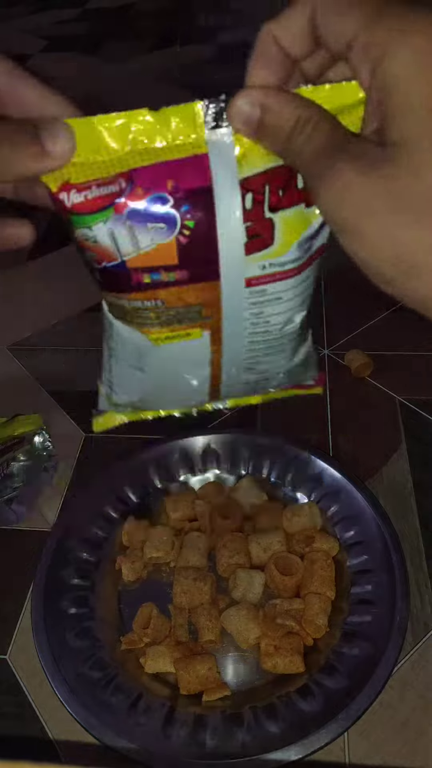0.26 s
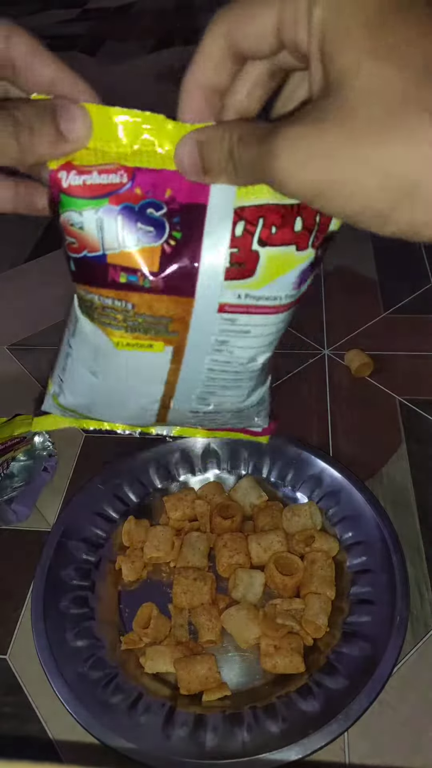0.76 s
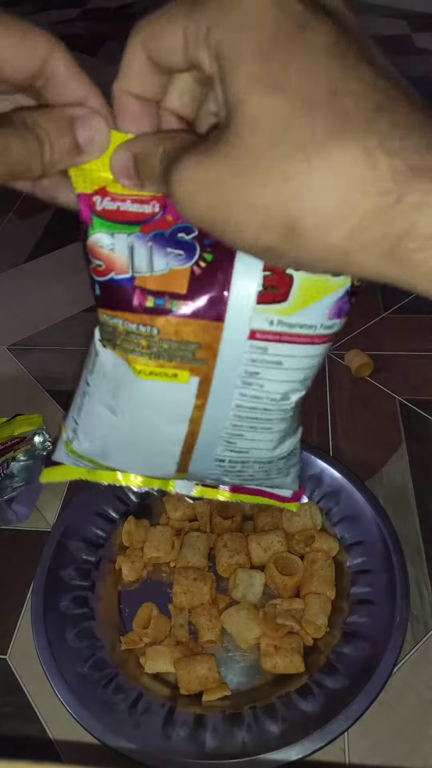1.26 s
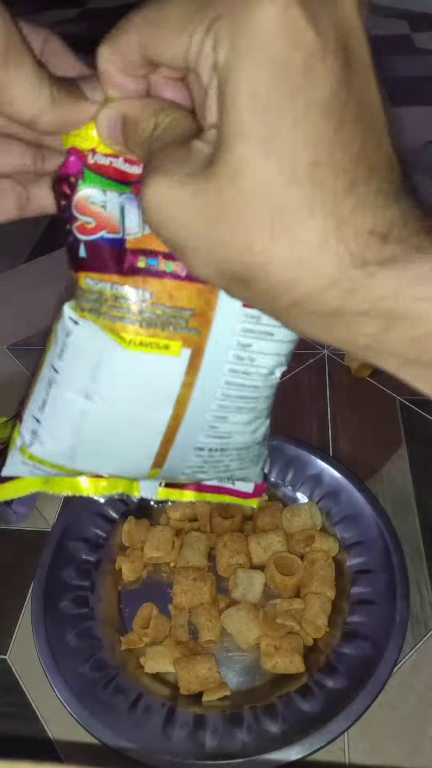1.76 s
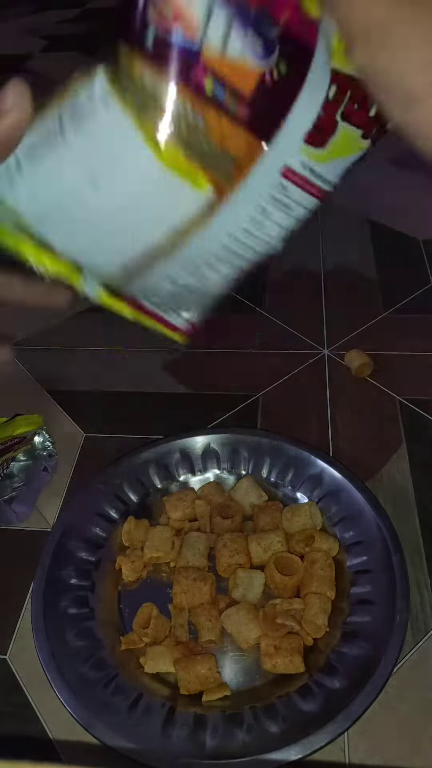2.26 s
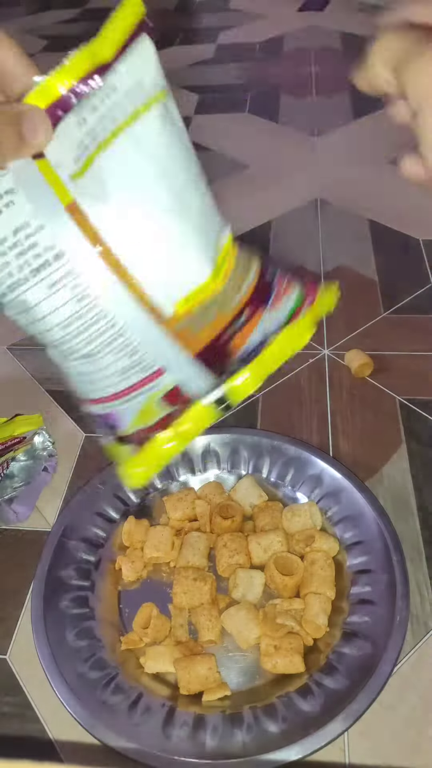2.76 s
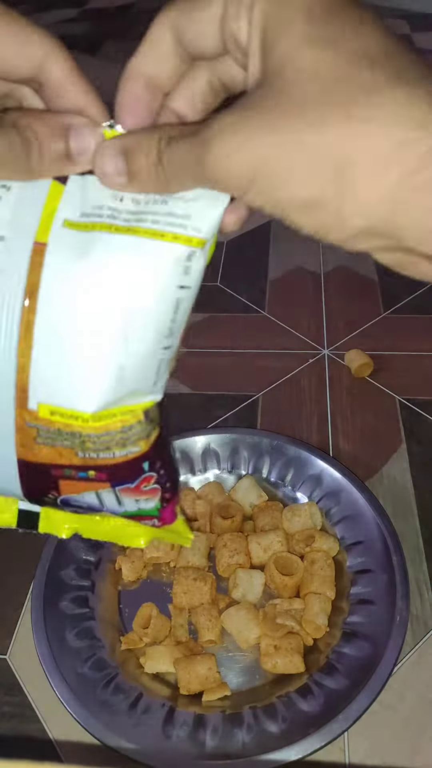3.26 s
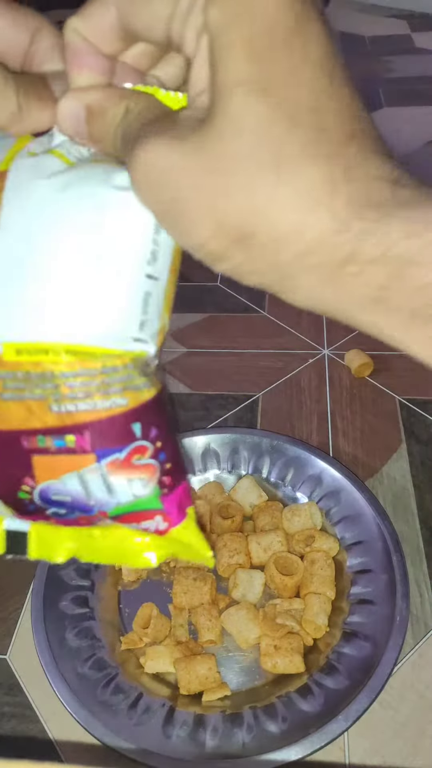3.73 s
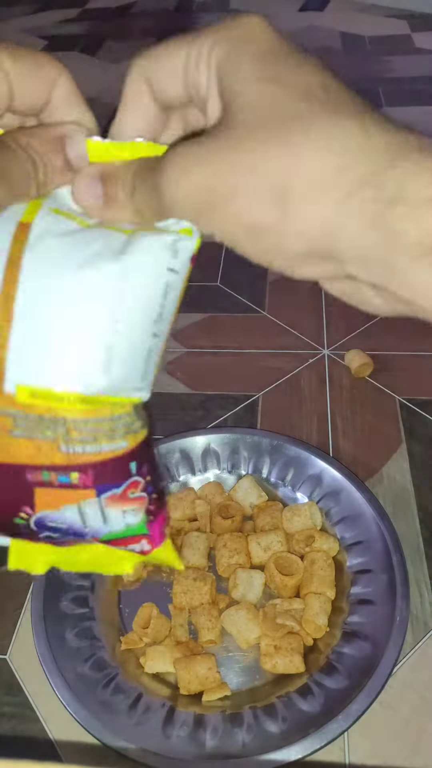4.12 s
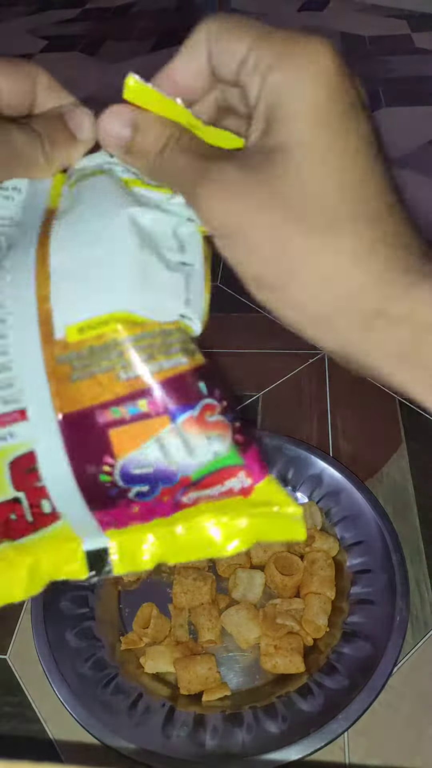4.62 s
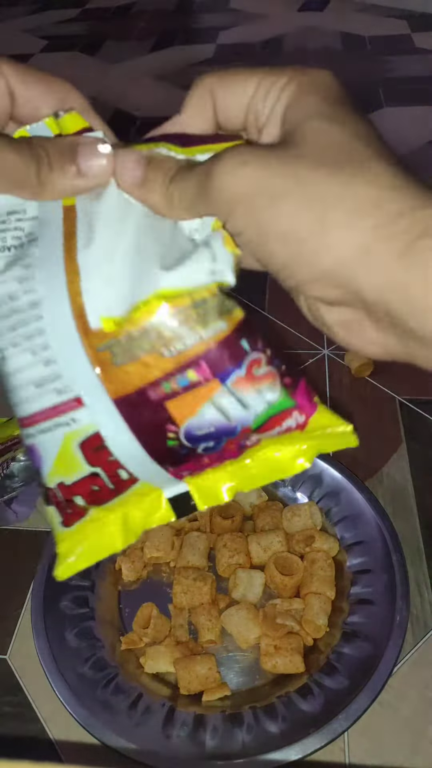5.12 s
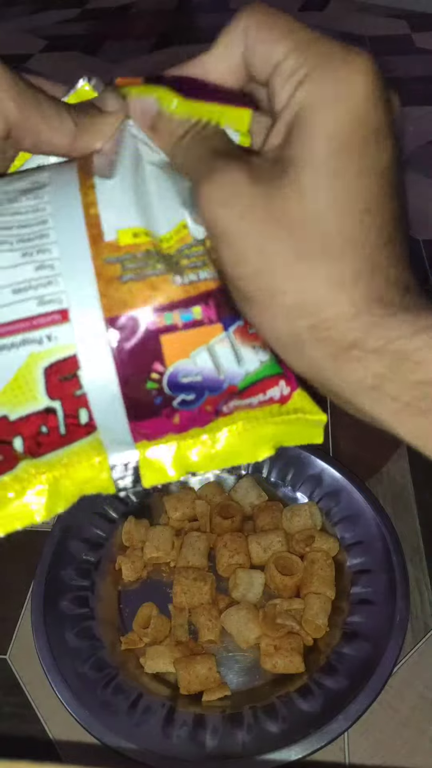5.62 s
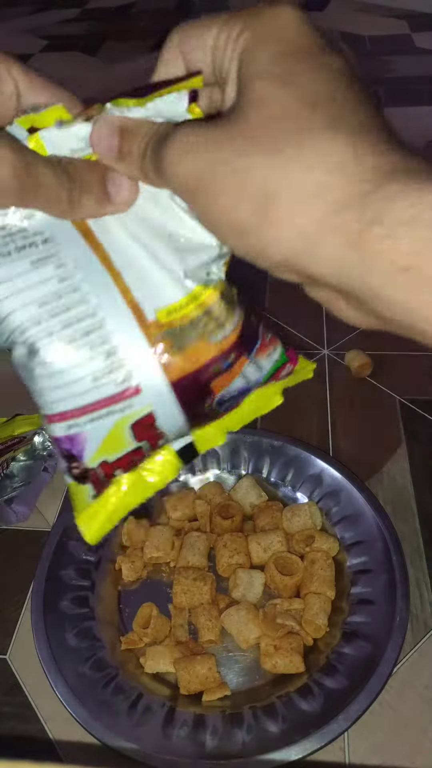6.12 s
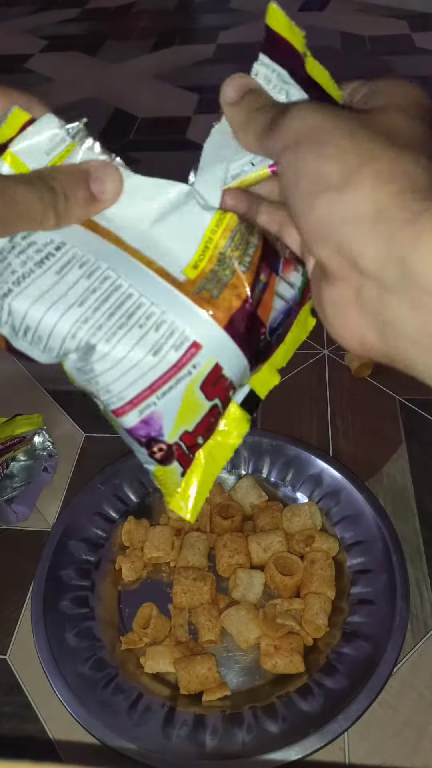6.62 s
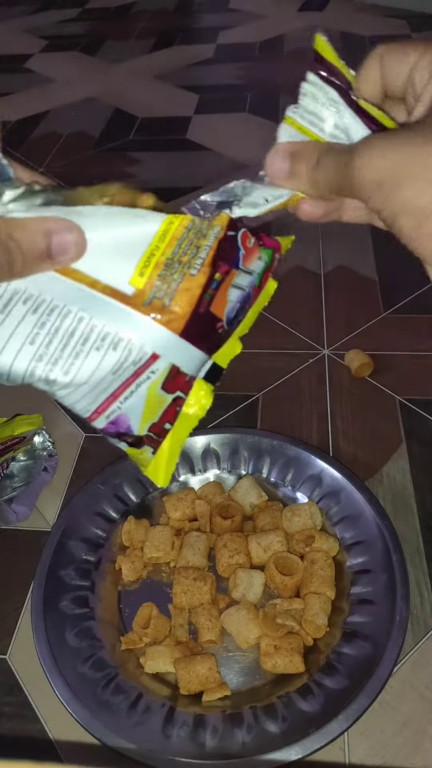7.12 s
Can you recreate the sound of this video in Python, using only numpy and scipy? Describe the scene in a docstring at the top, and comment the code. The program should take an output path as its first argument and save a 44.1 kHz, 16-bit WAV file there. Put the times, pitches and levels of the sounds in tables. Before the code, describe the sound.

Dry, crisp plastic film crackles right beside a phone in a small room. Quick snaps over tiny crinkle swarms come in uneven pulls, quieter around one second, stronger after two, fiercest from four to seven. Fingers rub the puffed bag, making soft hollow pops and dull thuds. The bright tearing crackle finally drops to a few small crinkles over low room rumble.

```python
"""Tearing open a plastic snack packet

Two hands pinch, twist and tear the sealed top of a packet, close to a phone in a small room.
Creases buckle with sharp snaps: short noise bursts, each with its own colour. Swarms of tiny bursts crinkle below.
The air-filled bag gives rubbing noise, hollow pops and soft thuds made of noise and a sagging tone.
Two microphone ports hear the film with different colours, over short echoes and a low room rumble."""
import sys
import numpy as np
from scipy import signal
from scipy.fft import rfft, irfft, next_fast_len
from scipy.io import wavfile
from scipy.ndimage import uniform_filter1d

SR = 44100
rng = np.random.default_rng(int(sys.argv[2]) if len(sys.argv) > 2 else 0)


def bounce(signal):
    """Save signal as a 16-bit WAV file at the path given by the first command-line argument."""
    frames = np.transpose(np.atleast_2d(signal))
    limited = np.clip(frames, -1, 1)
    pcm = np.round(limited * 32767).astype(np.int16)
    wavfile.write(sys.argv[1], SR, pcm)


N = 325590  # length in samples

# The loudest creases buckling; lengths are limited when played:
# (time [s], level [dB], length [ms], brightness [dB])
LOUD_SNAPS = [(0.0237, -18, 2.9, -3), (0.0612, -21.5, 1.9, -3), (0.0954, -16.5, 2.3, 0),
              (0.133, -17.5, 3.9, -6.5), (0.169, -19.5, 0.5, 29), (0.209, -23.5, 3.2, 3),
              (0.2613, -14, 1.6, 0), (0.2994, -22.5, 1.8, -8), (0.3143, -21, 1.2, 7),
              (0.3693, -18, 1.3, 5.5), (0.3847, -20, 0.78, 6), (0.4928, -26.0, 2.3, -2),
              (0.5414, -25, 1.7, -4), (0.6307, -21.5, 3, -7), (0.7418, -22, 4.6, -7.5),
              (0.8192, -28.5, 2.5, -9), (0.8794, -27.5, 2, -12), (0.9045, -29.5, 1.6, 5),
              (1.0102, -30, 0.77, 5), (1.0401, -35.5, 1.6, -1), (1.0548, -25.5, 1.5, 6),
              (1.1337, -20.5, 1.5, -1), (1.225, -24.0, 1.5, 5), (1.2928, -24.5, 1.2, 20),
              (1.3366, -25, 2.4, -2), (1.3695, -23, 1.9, 0), (1.417, -23, 2.2, 1), (1.505, -25.0, 1.2, 3),
              (1.5726, -24.5, 2.3, -16), (1.6075, -18.5, 1.2, -10), (1.7514, -17.5, 0.87, -1.5),
              (1.7856, -25, 1.4, 6), (1.8034, -22, 1.7, -1), (1.841, -21.5, 1.6, 2), (1.8868, -23, 2.8, -7),
              (1.914, -21, 1.7, 4), (1.9437, -18.5, 2.1, -2), (1.963, -23.5, 0.8, 11),
              (1.989, -20.5, 1, -5), (2.0088, -20.5, 3.5, 0), (2.0798, -21.5, 1.8, -4), (2.159, -16, 2, 10),
              (2.2066, -16.5, 1.5, 7), (2.2224, -17.5, 0.84, -15), (2.3391, -25, 4.3, -7),
              (2.4199, -24.5, 1.4, -1), (2.5547, -21.5, 4.5, 4), (2.611, -22, 1.6, 4),
              (2.7034, -22, 1.6, 7), (2.7943, -23, 1.9, 2), (2.8127, -14, 1.9, -4), (2.991, -23.5, 1.1, 15),
              (3.0584, -21.5, 1.8, 3), (3.0795, -18.5, 0.97, 10), (3.121, -22, 1.9, -3),
              (3.1498, -21, 1.9, 0), (3.2539, -22.5, 1.8, -15), (3.3222, -18, 2.1, 3),
              (3.4514, -23.5, 1.6, 0), (3.6518, -21, 0.4, 7), (3.6661, -16.5, 2.9, -6),
              (3.7026, -24, 2.4, -6), (3.7193, -18.5, 0.89, 8), (3.783, -24.5, 2.3, -8),
              (3.8253, -26.5, 1.8, -3), (3.8807, -28, 1.1, -3), (3.9327, -20.5, 1.1, 3),
              (4.0768, -15, 3.7, -1), (4.0946, -16, 2.3, 0), (4.1157, -14.0, 2.6, -4), (4.15, -14, 3.2, 4),
              (4.1667, -18, 2.7, 0), (4.191, -14.0, 2.9, -1), (4.2534, -20.0, 1.7, 11),
              (4.332, -18, 1.3, -1), (4.3464, -14.5, 0.46, 10), (4.355, -15.5, 2.3, 9),
              (4.405, -18.5, 2.7, 3), (4.425, -12.5, 4.3, 8), (4.4641, -16, 5, -16),
              (4.4965, -14.5, 1.9, 1), (4.6127, -16, 2.9, 5), (4.6508, -18, 0.91, 9), (4.7001, -13, 3, -1),
              (4.8152, -21, 1.8, 6), (4.885, -18.5, 2.2, -5), (4.926, -16, 1.8, 17.5),
              (5.032, -17.5, 1.5, 0), (5.0583, -16.5, 0.98, 2), (5.1104, -24, 2.1, 14),
              (5.1664, -16.5, 3.1, 8), (5.284, -14.0, 2.9, 7), (5.3863, -14.5, 1.7, 4),
              (5.4117, -14.0, 2.8, 7), (5.5012, -12.5, 5.6, 18), (5.5226, -19, 2.4, -7),
              (5.5674, -19.5, 3.8, -1), (5.6841, -23.5, 0.98, -15), (5.7846, -22.0, 2.6, 12),
              (5.882, -19, 3.2, -3), (5.9396, -17, 2.9, 1), (5.976, -21, 0.94, 3), (6.0525, -19, 3.5, -2),
              (6.077, -18.5, 1.2, 14), (6.0958, -17.5, 3.3, 14), (6.1802, -22.5, 1.6, -11),
              (6.193, -16, 1.2, 3), (6.3625, -21, 2.3, 6), (6.384, -17, 2.1, 11), (6.4194, -9.5, 0.9, 24),
              (6.4334, -12, 1.8, 18), (6.653, -20, 3.9, -3), (6.7319, -20, 3.0, 6), (6.7847, -23.5, 1.3, 9),
              (6.877, -19.5, 3.4, 16), (6.9361, -16.5, 2.2, 7), (6.9957, -24, 0.96, 12),
              (7.0122, -17.5, 2.2, 6), (7.0459, -18, 3.1, 15), (7.109, -14.5, 0.79, 18),
              (7.3615, -26.0, 1.4, 10)]
# Whole panels of the bag flipping: (time [s], level [dB], centre pitch [Hz])
PANEL_FLEXES = [(.431, -34, 710), (.492, -33, 496), (1.129, -38, 395), (1.206, -38, 344), (2.204, -22, 770),
                (2.335, -31, 201), (2.81, -36, 402), (3.662, -20.5, 756), (3.699, -32, 596),
                (4.4225, -16, 362), (4.461, -24, 477), (4.609, -24.5, 496), (5.499, -26.5, 348),
                (5.881, -26.5, 490), (5.94, -25, 410), (6.449, -23, 790), (6.724, -31.5, 426),
                (7.045, -29, 634), (7.101, -21, 1265)]
# Colour of the film at the left port: (frequency [Hz], relative level [dB per Hz])
FILM_LEFT = [(500, -9.5), (1100, -10.5), (1450, 5), (1900, -5.5), (2200, 3.5), (2750, 3), (3300, 6),
             (3800, -1.5), (4700, 6), (5600, 0.5), (7500, 0.5), (10500, -4), (13200, -8), (15800, -11)]
# Colour of the film at the right port: (frequency [Hz], relative level [dB per Hz])
FILM_RIGHT = [(500, -13), (1000, -11), (1250, 3.5), (1480, -7), (1800, 2.5), (2200, -6.5), (2750, 4),
              (3500, 2), (4100, 3), (5500, 0.5), (7500, 0.5), (8500, 1.5), (11000, 0), (14500, 3)]
# Colour of the hollow bag under the fingers: (frequency [Hz], relative level [dB per Hz])
BAG_COLOUR = [(40, -50), (120, 1.5), (230, -12), (430, 2.5), (650, 4.5), (1000, 0.5), (1350, 0), (2000, 8),
              (4000, -16.5)]
# Colour of the room background: (frequency [Hz], relative level [dB per Hz])
FLOOR_COLOUR = [(10, -13), (25, 4.5), (80, 10), (115, 0.5), (250, -4), (500, -45), (1000, -33), (3000, -46),
                (15000, -55)]
# How alike left and right are: (frequency [Hz], likeness [0 to 1])
LIKENESS = [(100, 0.92), (500, 1), (1000, 0.067), (1350, 0.75), (2750, 0.52), (4000, 0.08), (15000, 0.04)]
# How long the room echoes take to fall by 60 dB: (frequency [Hz], time [s])
ROOM_T60 = [(200, 0.088), (2000, 0.52), (8000, 0.37), (15000, 0.086)]
# How far the left port trails the right, before any stretch: (frequency [Hz], phase [radians])
PORT_PHASE = [(50, 0.042), (350, 0.69), (860, 0.93), (1250, 0.09), (1720, 2.1), (2400, 2.95), (3100, 4.36),
              (3800, 8.61)]
# Pulls, pinches and twists of the fingers, timed from full strength; levels before the crinkle and bag mixes:
# (time [s], length [s], crinkle level [dB], bag level [dB], brightness [dB])
FINGER_PULLS = [(0.024, 0.12, -32.5, -41, -1), (0.25, 0.031, -35.5, -41.5, 3),
                (0.57, 0.086, -39, -43.5, -5), (0.724, 0.0069, -48, -61, -8), (1.208, 0.034, -38.5, -42, 0),
                (1.328, 0.051, -33, -47, 1.5), (1.545, 0.031, -38, -53, 6), (1.77, 0.062, -37.5, -64, 0),
                (1.94, 0.062, -35.5, -59, -1), (2.056, 0.17, -40.5, -52, -1), (2.188, 0.075, -39, -40, 3),
                (2.529, 0.064, -36, -36.5, -3), (2.642, 0.12, -44, -38.5, -8), (2.798, 0.048, -34, -36, -6),
                (2.988, 0.035, -36.5, -48, -2), (3.06, 0.088, -37, -45, -4),
                (3.244, 0.28, -36.5, -53.5, -1), (3.554, 0.035, -33.5, -45.5, -16),
                (3.652, 0.066, -36.5, -39.5, -4), (3.978, 0.1, -34, -44, 1),
                (4.091, 0.11, -32.5, -48.5, -5), (4.217, 0.057, -46, -40.5, -3),
                (4.297, 0.036, -34.5, -48, -7), (4.421, 0.081, -28.5, -36, -0.5),
                (4.536, 0.19, -35, -41.5, -3), (4.805, 0.1, -31.5, -43, 10.5),
                (5.007, 0.067, -36.5, -42.5, 7), (5.084, 0.1, -30, -39.5, 7.5),
                (5.252, 0.082, -31.5, -44.5, 0), (5.376, 0.037, -32.5, -60, 1),
                (5.485, 0.029, -25, -36.5, 6), (5.683, 0.056, -35.5, -44, -2),
                (5.78, 0.068, -34, -46.5, 11), (5.864, 0.089, -30.5, -39.5, 0),
                (5.977, 0.16, -32.5, -41, 2), (6.18, 0.2, -30.5, -40.5, 3.5), (6.429, 0.047, -24.5, -42, 2),
                (6.644, 0.026, -37.5, -64, -6), (6.803, 0.41, -35.5, -48.5, 2.5),
                (7.079, 0.14, -31.5, -41.5, 2)]
# Faint crinkle of the packet merely being held, before the crinkle mix: (time [s], level [dB])
HOLDING_CRINKLE = [(0, -37), (.45, -46.5), (.95, -50), (1.45, -42.5), (1.72, -53.5), (1.9, -42.5),
                   (2.4, -49), (2.7, -35), (2.95, -48), (3.5, -53), (3.78, -41), (3.9, -45), (4.3, -38.5),
                   (5.63, -43.5), (6.2, -50), (6.6, -44), (7.0, -48), (7.38, -46)]
# The hands shifting their hold, timed from full strength; levels before the left-right balance:
# (time [s], length [s], rumble level [dB])
HAND_SHIFTS = [(0, .08, -43.5), (0.257, 0.036, -48.5), (1.38, 0.064, -50), (2.33, 0.031, -50),
               (2.736, 0.095, -52), (4.79, 0.14, -52), (5.9, .08, -51.5)]

TOP_HZ = 15950  # nothing is kept from here up
GRAIN_LIFE_S = .0016  # fading time of one tiny crinkle
GRAIN_SPREAD_DB = 5
ONE_MS_GAIN = np.sqrt(SR / 1000)  # a snap's level is its energy over one millisecond
BURST_T = np.arange(-400, 900) / SR  # s, with the burst centred on zero
# the film takes up the strain quickly and settles after the fingers stop
PULL_ATTACK_S, RELAX_DB_PER_S = 0.01, 206
HOLDING_BAG_DB = -50  # bag level while the packet is merely held, before the bag mix
FLEX_T60_S = 0.041  # time for the noisy part of a flex to fall by 60 dB
SHIFT_ATTACK_S, SHIFT_FADE_DB_PER_S = 0.055, 69
# lesser creases: how many, level over the film gain, typical brightness and length
SMALL_COUNT, SMALL_OVER_DB, SMALL_BRIGHT_DB, SMALL_LENGTH_MS = 260, 7, 2, 1.8
SHORTEST_SNAP_MS, LONGEST_SNAP_MS = .2, 3.5
PORT_BALANCE_DB = [[1.2], [-1.2]]  # left and right, for the background


def snaps(lead_s=.0002, pan_spread_db=2.0):
    """Loud creases buckle, each at its own left-right spot on the packet."""
    out = np.zeros((2, N))
    pans = pan_spread_db * rng.standard_normal(len(LOUD_SNAPS))
    for (s, db, length_ms, bright_db), pan_db in zip(LOUD_SNAPS, pans):
        length_ms = np.clip(length_ms, SHORTEST_SNAP_MS, LONGEST_SNAP_MS)
        gain = amp(db) * ONE_MS_GAIN * amp([[pan_db / 2], [-pan_db / 2]])
        add(out, s + BURST_T[0] - lead_s, gain * buckle(length_ms, bright_db))
    return out


def small_snaps(film_gain, spread_db=1.5, length_spread=0.3, bright_spread_db=5):
    """Lesser creases give way at random, louder when the film is worked harder."""
    out = np.zeros((2, N))
    when = (np.arange(SMALL_COUNT) + rng.random(SMALL_COUNT)) / SMALL_COUNT
    variety = np.clip(rng.standard_normal((SMALL_COUNT, 3)), -2, 2)
    for share, (size, slow, colour) in zip(when, variety):
        gain = film_gain[int(share * N)] * amp(SMALL_OVER_DB + spread_db * size) * ONE_MS_GAIN
        length_ms = SMALL_LENGTH_MS * np.exp(length_spread * slow)
        crease = buckle(length_ms, SMALL_BRIGHT_DB + bright_spread_db * colour)
        add(out, share * N / SR + BURST_T[0], gain * crease)
    return out


def buckle(length_ms, bright_db, ripple_db=4.5, ring_db=-14, detune=0.025, wander=0.092):
    """One facet flips: a very short swell into a crack with its own resonances,
    over a duller shiver of the sheet. Energy 1."""
    t = BURST_T
    length = length_ms / 1000  # in seconds
    crack = np.exp(-np.abs(t) / (length * np.where(t < 0, .6, 1.3)))
    shiver = amp(ring_db) * np.exp(-np.abs(t) / np.where(t < 0, 1.3 * length, .002 + length))
    noise = rng.standard_normal((2, 2, len(t)))
    knots = rng.standard_normal(size=30)  # random peaks and dips across the spectrum
    size, place = rng.standard_normal(size=2)

    def facet_colour(hz):
        """Random resonances plus a tilt towards bright or dull."""
        ripple = np.interp(np.sqrt(2 * hz / SR), np.linspace(0, 1, len(knots)), knots)
        return amp(ripple_db * ripple + bright_db * treble(hz))

    burst = crack * noise[0] + filtered(shiver * noise[1], lambda hz: amp(-6 * treble(hz)))
    burst = ports(burst, 1 + wander * place)
    burst = filtered(burst, lambda hz: film(hz, np.exp(detune * size)) * facet_colour(hz))
    return burst / np.sqrt(np.sum(burst ** 2) / 2)


def film(hz, size=1):
    """Colour of the film at both ports; a larger facet sounds lower."""
    return amp([along(FILM_LEFT, hz * size), along(FILM_RIGHT, hz * size)]) * (hz < TOP_HZ)


def crinkle(film_gain, bright_db, rate=900, spread_db=GRAIN_SPREAD_DB, level_db=-3):
    """Tiny facets keep flipping while the film is worked, each a millisecond or two of crackle."""
    life = np.exp(-2 * np.abs(BURST_T) / (GRAIN_LIFE_S * np.where(BURST_T < 0, .5, 1)))
    shared = ticks(rate / 2, spread_db) ** 2
    sheet = filtered(ports(refold(rng.standard_normal((2, N)), depth_db=4.5)), film)
    high = filtered(sheet, lambda hz: treble(hz) + .5)
    low = sheet - high

    def flicker():
        """Half the flips are shared by both ranges, half belong to one; powers add, so take a root."""
        flips = shared + ticks(rate / 2, spread_db) ** 2
        power = np.abs(signal.oaconvolve(flips, life, mode="same"))
        return unit(np.sqrt(power))

    up, down = amp(bright_db / 2), amp(-bright_db / 2)
    grains = (up * high * flicker() + down * low * flicker()) / np.std(sheet)
    return film_gain * amp(level_db) * grains / np.sqrt((up ** 2 + down ** 2) / 2)


def ticks(rate, spread_db):
    """Random impulses of varied size, with rate as their average number per second."""
    chance, size = rng.random(N), rng.standard_normal(N)
    return (chance < rate / SR) * amp(spread_db * np.clip(size, -2, 1.5))


def refold(x, depth_db):
    """New folds have narrow resonances of their own: the colour changes within hundredths of a second."""
    z = signal.stft(x, nperseg=512)[2]
    field = rng.standard_normal(z.shape[1:])
    for _ in range(2):
        # smooth over frequency, then over time
        field = uniform_filter1d(field, size=2, axis=0)
        field = uniform_filter1d(field, size=6, axis=1)
    return signal.istft(z * amp(depth_db * unit(field)), nperseg=512)[1][:, :N]


def bag(bag_gain, rub_db=-5, pop_db=-9.5):
    """Fingers rub the inflated bag and press small hollow pops out of it."""
    rub = ports(refold(rng.standard_normal((2, N)), depth_db=6.5))
    rub = unit(filtered(rub, lambda hz: amp(along(BAG_COLOUR, hz))))
    hollow = unit(ports(np.array([pops(), pops()])))
    return bag_gain * (amp(rub_db) * rub + amp(pop_db) * hollow)


def pops(count=900, centre_hz=540, scatter=0.532, cycles=1.6, spread_db=4):
    """Small dimples of the inflated bag flip at random, each a few cycles at its own pitch."""
    out, t = np.zeros(N + SR), np.arange(SR // 30) / SR
    when, (pitch, size) = rng.random(count), rng.standard_normal((count, 2)).T
    turns = centre_hz * np.exp(scatter * np.clip(pitch, -2, 2))[:, None] * t  # cycles so far
    envelope = np.exp(-turns / cycles) * (1 - np.exp(-2 * turns))
    gain = amp(spread_db * np.clip(size, -2, 1.5))[:, None]
    dimples = gain * np.sin(2 * np.pi * turns) * envelope
    # bincount adds every dimple at its own place
    index = (when * N).astype(int)[:, None] + np.arange(len(t))
    return np.bincount(index.ravel(), dimples.ravel(), len(out))[:N]


def flexes(attack_s=0.00061, sharpness=1.0, tone=0.72, sag=0.13):
    """A panel flips and pushes the air inside: a short hollow pop whose pitch sags as the film slackens."""
    out, t = np.zeros((2, N)), np.arange(SR // 8) / SR
    fall_db = -60 * t / FLEX_T60_S
    for s, db, centre_hz in PANEL_FLEXES:

        def hollow(hz):
            """Two equal resonances in a row."""
            width = 2j * hz * centre_hz
            return (1j * hz * centre_hz / (sharpness * (centre_hz ** 2 - hz ** 2) + width)) ** 2

        flutter = unit(filtered(ports(rng.standard_normal((2, len(t)))), hollow))
        swing = np.sin(2 * np.pi * centre_hz * t * (1 - sag * t / FLEX_T60_S))
        swing = swing * amp(fall_db)  # the tone falls twice as fast as the noise
        envelope = amp(db + fall_db) * (1 - np.exp(-t / attack_s))
        add(out, s, (0.58 * flutter + tone * swing) * envelope)
    return out


def handling():
    """How hard the film is worked, per sample: crinkle gain, bag gain and brightness in dB."""
    film_power = amp(curves(HOLDING_CRINKLE)[0]) ** 2
    bag_power = np.full(N, amp(HOLDING_BAG_DB) ** 2)
    bright = np.zeros(N)
    for start, length, crinkle_db, bag_db, bright_db in FINGER_PULLS:
        effort = stroke(start, length, PULL_ATTACK_S, RELAX_DB_PER_S) ** 2
        film_power += effort * amp(crinkle_db) ** 2
        bag_power += effort * amp(bag_db) ** 2
        bright += effort * amp(crinkle_db) ** 2 * bright_db
    # brightness is an average in which louder crinkle counts for more
    return np.sqrt(film_power), np.sqrt(bag_power), bright / film_power


def stroke(start, length, attack_s, fade_db_per_s):
    """Gain of one hand movement: it rises up to the start, holds for its length and dies away."""
    t = np.arange(N) / SR - start
    return np.clip(1 + t / attack_s, 0, 1) * amp(-np.clip(fade_db_per_s * (t - length), 0, 120))


def hand_rumble(rumble_hz=102):
    """Shifting hands give a dull rumble: noise strongest near rumble_hz."""
    noise = ports(rng.standard_normal((2, N)))
    rumble = unit(filtered(noise, lambda hz: (hz / rumble_hz) ** 3 / (1 + (hz / rumble_hz) ** 5)))
    shifting = sum(amp(db) * stroke(start, length, SHIFT_ATTACK_S, SHIFT_FADE_DB_PER_S)
                   for start, length, db in HAND_SHIFTS)
    return shifting * rumble * amp(PORT_BALANCE_DB)


def room(x, delay_s=.006):
    """The walls answer with fading noise; each frequency dies away at its own speed."""
    hz, t, z = signal.stft(rng.standard_normal((2, SR // 2)), SR, nperseg=256)
    fade = amp(-60 * t / along(ROOM_T60, hz)[:, None])
    tail = signal.istft(z * fade, SR, nperseg=256)[1]
    tail = np.pad(tail / np.linalg.norm(tail[0]), ((0, 0), (round(delay_s * SR), 0)))
    return signal.fftconvolve(x, tail, axes=1)[:, :N]


def room_floor(floor_db=-54):
    """Steady low room noise, made by colouring random noise."""
    noise = ports(rng.standard_normal((2, N)))
    floor = unit(filtered(noise, lambda hz: amp(along(FLOOR_COLOUR, hz))))
    return amp(floor_db) * floor * amp(PORT_BALANCE_DB)


def ports(pair, stretch=1):
    """Two unrelated signals become left and right, alike in the bass; stretch sets how far off-axis they sit."""
    def blend(hz):
        """Gains for the shared part and the opposite part."""
        turn = np.arccos(np.clip(along(LIKENESS, hz), 0, 1)) / 2
        return np.array([np.cos(turn), np.sin(turn)])

    def lag(hz):
        """Left is turned back and right forward by half the phase each."""
        return np.exp(.5j * stretch * along(PORT_PHASE, hz) * np.array([[-1], [1]]))

    mid, side = filtered(pair, blend)
    return filtered(np.array([mid + side, mid - side]), lag)


def treble(hz, split_hz=6500):
    """Runs from -1/2 in the low range to +1/2 in the high treble."""
    return hz ** 4 / (hz ** 4 + split_hz ** 4) - .5


def amp(db):
    """Decibels to gain."""
    return 10 ** (np.asarray(db) / 20)


def unit(x):
    """Scaled to an average (rms) strength of 1."""
    return x / np.sqrt(np.mean(x ** 2) + 1e-20)


def along(points, hz):
    """Reads a (frequency, value) table on a log frequency axis."""
    f, v = np.transpose(points)
    return np.interp(np.log(hz + 1), np.log(f + 1), v)


def curves(rows):
    """One value per sample for each column after the time."""
    s, *cols = np.transpose(rows)
    return [np.interp(np.arange(N) / SR, s, c) for c in cols]


def filtered(x, response):
    """Multiplies the spectrum of x by a response that depends on frequency."""
    n = x.shape[-1]
    m = next_fast_len(n + 2048)
    return irfft(rfft(x, m) * response(np.fft.rfftfreq(m, 1 / SR)), m)[..., :n]


def add(out, s, x):
    """Mixes x into out from time s, cutting what falls outside."""
    i = round(s * SR)
    x = x[:, max(-i, 0):max(N - i, 0)]
    out[:, max(i, 0):max(i, 0) + x.shape[1]] += x


def scene(room_db=-14):
    """The packet close by, its room echoes, the shifting hands and the background."""
    film_gain, bag_gain, bright_db = handling()
    creases = snaps() + small_snaps(film_gain)
    packet = creases + crinkle(film_gain, bright_db) + bag(bag_gain) + flexes()
    return packet + amp(room_db) * room(packet) + hand_rumble() + room_floor()


def record(dry):
    """The phone keeps nothing above its band limit."""
    return filtered(dry, lambda hz: hz < TOP_HZ)


dry = scene()
out = record(dry)
bounce(out)
```